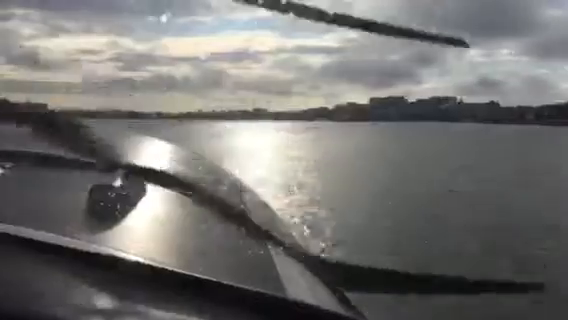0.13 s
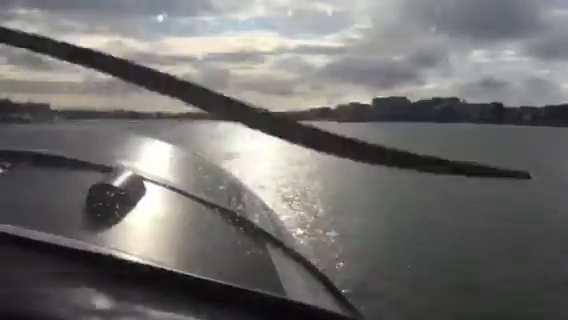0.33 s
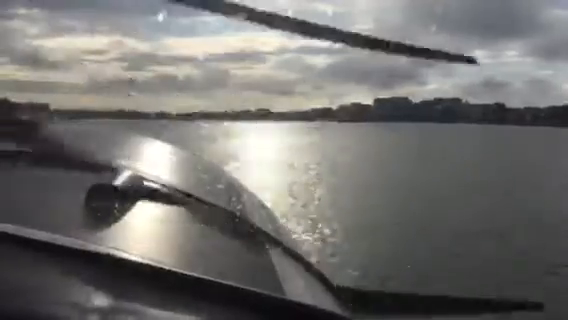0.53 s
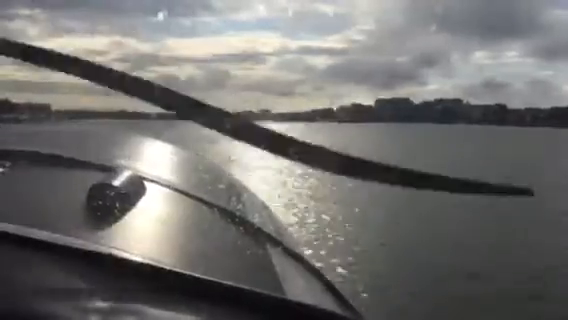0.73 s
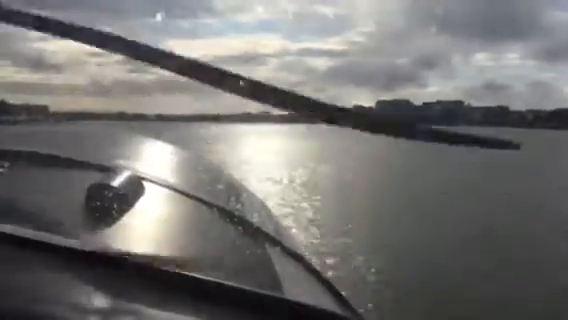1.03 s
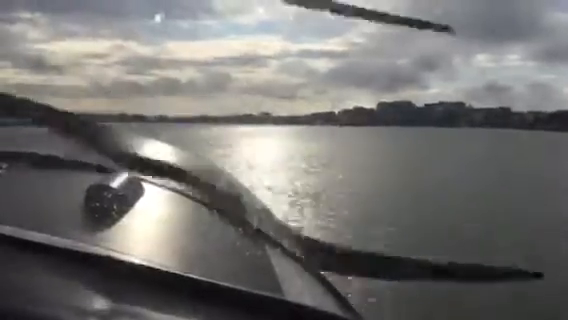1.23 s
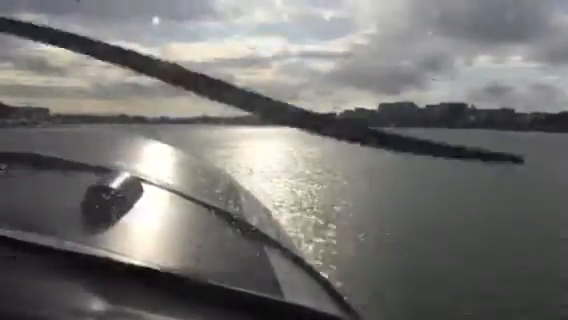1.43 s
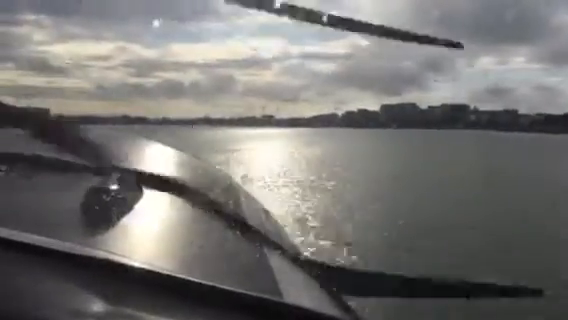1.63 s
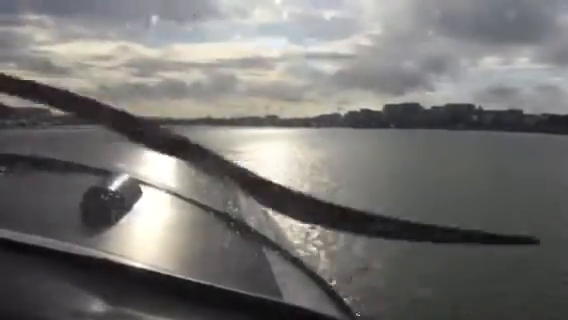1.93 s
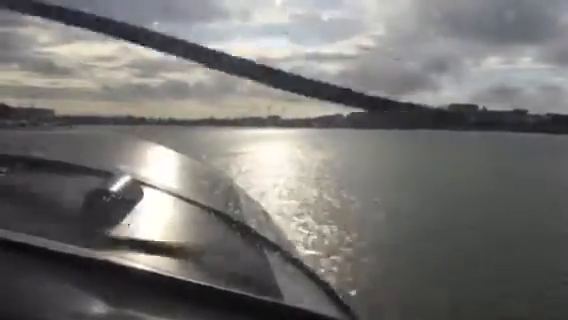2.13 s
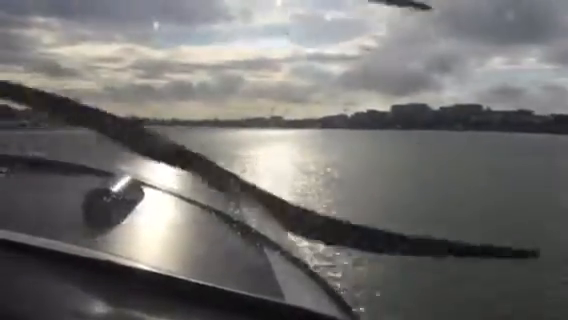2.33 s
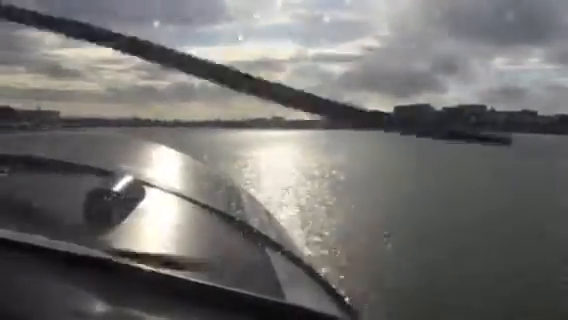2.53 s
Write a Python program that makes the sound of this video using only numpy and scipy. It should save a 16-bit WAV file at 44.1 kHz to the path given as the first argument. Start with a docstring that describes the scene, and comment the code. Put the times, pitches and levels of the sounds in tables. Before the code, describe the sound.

Steady deep piston-engine roar of a light seaplane from inside, with airframe rumble and wind hiss

```python
"""Inside the cabin of a small seaplane running low over water at steady throttle, unchanged from start to end.
In every engine cycle six cylinders puff unevenly: orders of the cycle rate, summed as sines, boom in the cabin.
A little after each puff's place in the cycle comes its rasp, a burst of coloured noise.
Throughout, filtered noise makes the airframe rumble, the propeller wash and slipstream, and the ringing panels;
wandering sines make the faint accessory whines."""
import sys
import numpy as np
from scipy import signal
from scipy.fft import rfft, irfft, next_fast_len
from scipy.io import wavfile

SR = 44100
rng = np.random.default_rng(int(sys.argv[2]) if len(sys.argv) > 2 else 0)


def int16_out(signal):
    """Quantize to a 16-bit WAV file."""
    q = np.round(np.clip(np.atleast_2d(signal).T, -1, 1) * 32767)
    wavfile.write(sys.argv[1], SR, q.astype(np.int16))


N = 118629  # samples

CYCLE_HZ = 14.558  # one cycle is two turns
SPEED_WANDER_SHARE, WANDER_RATE_HZ = 0.00033, 4.4


def from_db(db):
    """Decibels to amplitude gain."""
    return 10 ** (np.asarray(db) / 20)


def rms_one(x):
    """Scale to unit rms."""
    return x / np.sqrt(np.mean(x ** 2) + 1e-20)


def drift(rate_hz):
    """Slow random signal of unit rms: white noise through two equal poles at rate_hz."""
    step = 40  # samples per drawn point
    pole = np.exp(-2 * np.pi * rate_hz * step / SR)
    white = rng.standard_normal(N // step + 2002)
    slow = signal.lfilter([1], [1, -2 * pole, pole * pole], white)
    slow = slow[2000:]  # drop the filter's settling
    return np.interp(np.arange(N) / step, np.arange(len(slow)), rms_one(slow))


def noise(spectrum):
    """Unit-rms noise shaped by a (Hz, dB) table, interpolated over log frequency."""
    hz, db = np.transpose(spectrum)
    size = next_fast_len(N)
    bins_hz = np.maximum(np.fft.rfftfreq(size, 1 / SR), 1)
    gain = from_db(np.interp(np.log(bins_hz), np.log(hz), db))
    shaped = irfft(rfft(rng.standard_normal(size)) * gain, size)
    return rms_one(shaped[:N])


def turning(hz, wander_share):
    """Running count of cycles of something that spins at a nearly steady rate."""
    error = drift(WANDER_RATE_HZ)
    error = error - error.mean()
    return np.cumsum(hz * (1 + wander_share * error)) / SR


# Airframe rumble spectrum. Each row: frequency in Hz, relative density in dB per Hz.
RUMBLE_SPECTRUM = [(15, -38), (30, -13), (42, -11), (55, -4.5), (90, -3.5), (120, -5), (165, -1.5),
                   (210, -8.5), (270, -12.5), (400, -29.5), (800, -53.5)]
RUMBLE_RMS_DB = -27


def rumble():
    """Low airframe rumble: steady noise with a low-frequency spectrum."""
    return from_db(RUMBLE_RMS_DB) * noise(RUMBLE_SPECTRUM)


# Accessory whines. Each row: frequency in Hz, level in dB rms.
WHINE_TONES = [(1048, -60), (4892, -75)]
WHINE_WANDER_SHARE = 0.001


def whines():
    """Gears and accessories: thin sines, each wandering in pitch on its own."""
    out = np.zeros(N)
    for hz, rms_db in WHINE_TONES:
        phase = 2 * np.pi * turning(hz, WHINE_WANDER_SHARE)
        out += np.sqrt(2) * from_db(rms_db) * np.sin(phase)
    return out


# Windscreen and cowling panel resonances. Each row: centre in Hz, width in Hz, level in dB rms.
PANEL_MODES = [(866, 47, -55.5), (1370, 68, -52.5), (1720, 100, -54.5), (2430, 90, -63)]
GUST_DB, GUST_RATE_HZ = 2, 14


def panes():
    """Windscreen and cowling panels: noise-driven resonators, each with gusts of its own."""
    out = np.zeros(N)
    for hz, width_hz, rms_db in PANEL_MODES:
        b, a = signal.iirpeak(hz, hz / width_hz, fs=SR)
        ring = signal.lfilter(b, a, rng.standard_normal(N))
        gusts = from_db(GUST_DB * drift(GUST_RATE_HZ))
        out += from_db(rms_db) * rms_one(ring * gusts)
    return out


# Slipstream and propeller wash spectrum. Each row: frequency in Hz, relative density in dB per Hz.
WASH_SPECTRUM = [(200, -8), (600, 0.5), (950, 3), (1100, 1), (1400, -1.5), (1750, -0.9), (2300, -2),
                 (2600, -5), (3100, -5.5), (3700, -8), (3880, -9.3), (4080, -9), (4500, -10.5), (4950, -13),
                 (5600, -13), (6800, -15.5), (7500, -19), (8500, -18.5), (9600, -18.5), (10400, -28.5),
                 (11200, -24.5), (13000, -28), (15200, -40)]
WASH_DB, FLICKER_DB, FLICKER_RATE_HZ = -39.5, 0.69, 21
BLADE_PASSES_PER_CYCLE, BLADE_CHOP_DEPTH = 4, 0.018


def wash(cycles):
    """Turbulent air on the windscreen: flickering noise, lightly chopped by the blades."""
    chop = 1 + BLADE_CHOP_DEPTH * np.cos(2 * np.pi * BLADE_PASSES_PER_CYCLE * cycles)
    level = from_db(WASH_DB + FLICKER_DB * drift(FLICKER_RATE_HZ))
    return level * chop * noise(WASH_SPECTRUM)


# Exhaust puffs as they reach the cabin, also played by boom().
# Each row: place in the two-turn cycle (0-1), relative strength in dB.
PUFF_TRAIN = [(.01, .1), (.181, -1.8), (.445, 1.1), (.565, 0), (.694, -.5), (.891, 1.5)]
# Gas rasp spectrum. Each row: frequency in Hz, relative density in dB per Hz.
RASP_SPECTRUM = [(150, -18), (260, -10), (340, 2), (430, -3), (560, -6.5), (660, -9.5), (770, -13.5),
                 (830, -42), (920, -9.5), (1100, -27.5), (2000, -27), (4000, -40.5)]
RASP_RMS_DB = -35.5
RASP_DELAY_CYCLES, RASP_WIDTH_CYCLES = 0.077, 0.02
RASP_FLOOR = 1.9  # steady rasp, against a 0 dB puff's peak of 1


def rasp(cycles):
    """Gas noise of the puffs: steady noise swelling in a short Gaussian burst after each one."""
    gate = np.full(N, RASP_FLOOR)
    for place, db in PUFF_TRAIN:
        away_cycles = (cycles - place - RASP_DELAY_CYCLES + .5) % 1 - .5
        gate += from_db(db) * np.exp(-.5 * (away_cycles / RASP_WIDTH_CYCLES) ** 2)
    return from_db(RASP_RMS_DB) * rms_one(gate * noise(RASP_SPECTRUM))


# Cabin air modes. Each row: centre in Hz, width in Hz, signed share at the seat.
AIR_MODES = [(54, 36, 1), (212, 16, -.45), (292, 30, -.33)]
# Engine orders of the boom. Each row: multiple of the cycle rate, relative level in dB.
BOOM_ORDERS = [(4, -11.6), (5, -15.6), (6, -1.4), (7, -0.2), (8, -9.9), (9, -2.6), (10, -7.7), (11, -4.3),
               (12, -7.4), (13, -12.5), (14, -13.3), (15, -16.6), (16, -11.5), (17, -29.9), (18, -26.5),
               (19, -26.7), (20, -37.3), (21, -25.1), (22, -20.3), (23, -33.0), (24, -37.7), (25, -24.9),
               (26, -30.7), (27, -27.8), (28, -34.9), (29, -37.3), (30, -33.8), (31, -35.4), (32, -29.6),
               (33, -29.4), (34, -37.1), (35, -30.8), (36, -31.2), (37, -36.5), (38, -35.1), (39, -32.1),
               (40, -36.1), (41, -43.8), (42, -41.1), (43, -36.5), (44, -35.7), (45, -43.3), (46, -37.0)]
BOOM_DB, UPPER_ORDERS_DB, UPPER_FROM_HZ = -20, -1, 340
UPPER_FLUTTER_SHARE = 0.3
UNEVEN_DB, UNEVEN_RATE_HZ = -0.16, 14  # the whole boom's level wavers slowly


def boom(cycles):
    """Engine orders: low ones phased by puff train and air modes, upper ones scattered and fluttering."""
    place, puff_db = np.transpose(PUFF_TRAIN)
    out = np.zeros(N)
    for order, level_db in BOOM_ORDERS:
        hz = order * CYCLE_HZ
        if hz < UPPER_FROM_HZ:
            puffs = -np.sum(from_db(puff_db) * np.exp(-2j * np.pi * order * place))
            cabin = 0
            for centre_hz, width_hz, share in AIR_MODES:
                cabin += share / (1 + 1j * (hz ** 2 - centre_hz ** 2) / (hz * width_hz))
            path = np.exp(1j * np.angle(puffs * cabin))  # phase only; the table sets the level
        else:
            flutter = 1 + UPPER_FLUTTER_SHARE * (drift(WANDER_RATE_HZ) + 1j * drift(WANDER_RATE_HZ))
            path = from_db(UPPER_ORDERS_DB) * flutter * np.exp(2j * np.pi * rng.random())
        tone = np.real(path * np.exp(2j * np.pi * order * cycles))
        out += np.sqrt(2) * from_db(level_db) * tone
    return out * from_db(BOOM_DB + UNEVEN_DB * drift(UNEVEN_RATE_HZ))


def scene():
    """Airframe, air and engine as heard from the seat, on one shared engine rotation."""
    cycles = turning(CYCLE_HZ, SPEED_WANDER_SHARE)
    air = panes() + wash(cycles)
    engine = rasp(cycles) + boom(cycles)
    return (rumble() + whines() + air + engine)[None]


CUTOFF_HZ = 15300


def record(dry):
    """Cut the top steeply with an elliptic low-pass."""
    low_pass = signal.ellip(12, .1, 90, CUTOFF_HZ, fs=SR, output="sos")  # order, ripple dB, stop dB
    return signal.sosfilt(low_pass, dry)


dry = scene()
out = record(dry)
int16_out(out)
```